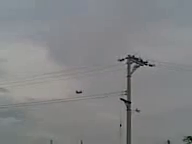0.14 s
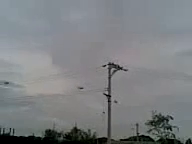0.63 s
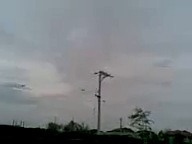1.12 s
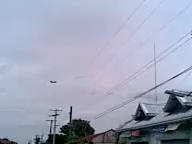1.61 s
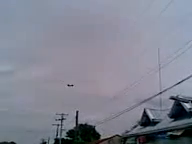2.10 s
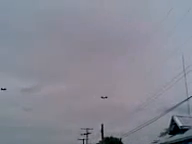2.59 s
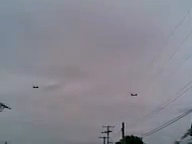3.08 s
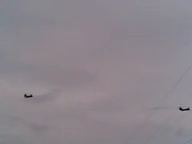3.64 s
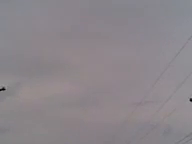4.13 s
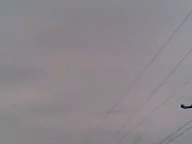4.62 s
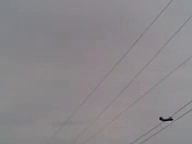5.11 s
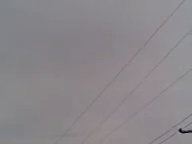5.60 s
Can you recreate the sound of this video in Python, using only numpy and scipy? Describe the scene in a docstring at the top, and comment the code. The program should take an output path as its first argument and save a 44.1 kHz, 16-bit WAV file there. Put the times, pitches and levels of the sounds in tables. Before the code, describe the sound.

Distant twin-rotor helicopters pass overhead, mostly buried by gusts striking the microphone at close range. Muffled, clipping thumps open the scene, followed by a quiet gap with dull rotor chops. After an abrupt cut, rumble, roar and hiss surge and tumble. Later the wind sinks, leaving muted rapid slaps and a thin drone in narrow, lo-fi sound.

```python
"""Twin-rotor helicopters pass far overhead, heard outdoors on a small hand-held microphone in gusty wind.
In runs, blade slaps crack some fourteen times a second, each a struck resonance with one echo off nearby walls.
Helicopters and rushing wind together make a broad drone, roar and hiss with a whine band, all flickering noise.
Close up, noise bursts thump on the microphone port and a lumpy noise rumbles and flutters there.
Two shots meet at a hard cut near 1.63 s; the narrow-band recorder overloads on the hardest gusts."""
import sys
import numpy as np
from scipy import signal
from scipy.io import wavfile

SR = 44100
rng = np.random.default_rng(int(sys.argv[2]) if len(sys.argv) > 2 else 0)


def to_linear_factor(level_db):
    """Convert decibel levels (scalar or array-like) to linear amplitude factors."""
    exponent = np.asarray(level_db, float) / 20
    return 10 ** exponent


def store_pcm(level_fs):
    """Save levels as 16-bit WAV."""
    pcm = np.round(np.clip(level_fs, -1, 1) * 32767).astype(np.int16)
    wavfile.write(sys.argv[1], SR, np.atleast_2d(pcm).T)


N = 252693

# Fixed resonances of every far slap. Each row: centre in Hz, width in Hz, level in dB.
SLAP_RESONANCES = [(416, 250, -8.5), (1400, 900, -13)]


def slaps():
    """A blade cuts the other rotor's vortex: a soft chop, a scattered tail and one smeared echo."""
    out = np.zeros(N)
    echo_lag = round(0.03 * SR)
    echo_db = -18
    for s, peak_db, hz in slap_rows():
        direct, back = rng.standard_normal((2, 8000))
        push = to_linear_factor(-16) * burst(direct, rise=0.0006, t60=0.075)
        push[40] += 1      # the crack itself, 0.9 ms in
        push[echo_lag:] += to_linear_factor(echo_db) * burst(back, rise=0.003, t60=0.07)[:-echo_lag]
        chop = resonance(resonance(push, hz, 0.25 * hz), hz, 0.25 * hz)
        for body_hz, width, level_db in SLAP_RESONANCES:
            chop += to_linear_factor(level_db) * resonance(push, body_hz, width)
        distant = dull(dull(chop, hz=1940), hz=2140)      # the long air path takes the treble
        add(out, s - 0.001, distant, peak_db)
    return out


# Runs of evenly spaced slaps. Each row: first slap in seconds, last slap in seconds.
SLAP_RUNS = [(0.781, 0.917), (1.189, 1.597), (3.719, 4.068), (4.801, 5.232), (5.252, 5.535), (5.588, 5.658)]
# The slaps as the machines move overhead, before scatter. Each row: time in seconds, peak in dB, centre in Hz.
SLAP_PATH = [(0.78, -41.5, 1130), (0.92, -30, 1170), (1.19, -29.5, 1100), (1.26, -32, 645),
             (1.33, -31.5, 665), (1.4, -28.5, 1100), (1.46, -30.5, 396), (1.53, -25, 684), (1.6, -25, 420),
             (3.72, -22.5, 370), (3.79, -25, 1100), (3.86, -31.5, 354), (4.07, -41.5, 377), (4.8, -32, 484),
             (5.08, -42, 425), (5.16, -36.5, 422), (5.24, -40, 600), (5.258, -26, 970), (5.32, -31, 590),
             (5.39, -21, 870), (5.46, -26.5, 1300), (5.54, -32.5, 464), (5.66, -28.5, 393)]


def slap_rows():
    """Time, peak dB and centre Hz of each blade pass; strength and pitch scatter from slap to slap."""
    blade_period_s = 0.0695
    scatter_db, pitch_scatter = 1.5, 0.06      # pitch as a fraction
    runs = []
    for first, last in SLAP_RUNS:
        count = round((last - first) / blade_period_s) + 1
        runs.append(np.linspace(first, last, count))
    s = np.concatenate(runs)
    at, path_db, path_hz = np.transpose(SLAP_PATH)
    chance = rng.standard_normal((len(s), 2))
    peak_db = np.interp(s, at, path_db) + scatter_db * chance[:, 0]
    hz = np.interp(s, at, path_hz) * np.exp(pitch_scatter * chance[:, 1])
    return zip(s, peak_db, hz)


# Broad drone, roar and hiss of helicopters and rushing wind together, with a whine band,
# in two lists: before and after the cut.
# Each row: time in seconds, drone in dB, roar in dB, hiss in dB, whine in dB.
WASH_LEVELS = [
    [(0.0, -35.5, -41, -39.5, -64), (0.24, -45, -48.5, -42.5, -59), (0.43, -31.5, -32.5, -45, -57),
     (0.65, -47, -50, -45, -66), (0.84, -63, -63, -54.5, -60.5), (1.1, -71, -59.5, -64.5, -69.5),
     (1.35, -74, -53.5, -83, -62), (1.43, -49.5, -47, -51.5, -62.5), (1.622, -53, -41.5, -77, -65)],
    [(1.63, -52, -24.5, -40, -60), (1.84, -44, -33, -40.5, -53), (2.07, -39.5, -33.5, -51, -54),
     (2.35, -53.5, -41, -44, -57), (2.62, -48, -38.5, -50, -57.5), (2.94, -43.5, -36, -53.5, -64.5),
     (3.1, -41, -41, -58, -57.5), (3.31, -48, -24.5, -49, -57), (3.4, -26.5, -59.5, -53.5, -79),
     (3.5, -38.5, -31, -45.5, -59.5), (3.67, -41.5, -38.5, -64, -68), (3.8, -41.5, -40, -52, -64),
     (3.94, -41, -57, -54, -63), (4.0, -51, -55, -65, -72.5), (4.3, -57, -54, -64, -76),
     (4.53, -45, -46.5, -56.5, -68.5), (5.05, -54.5, -58, -66.5, -82.5), (5.3, -48, -51, -64, -77),
     (5.4, -44.5, -43.5, -69, -79), (5.55, -40, -44.5, -57, -70), (5.73, -43.5, -48.5, -62, -71)],
]
# Spectra of the broad drone, roar and hiss. Each row: frequency in Hz, relative density in dB per Hz.
DRONE_SPECTRUM = [(53, -36), (90, 1), (135, 7), (297, -1), (415, 8), (700, -5.5), (910, -45.5),
                  (1540, -120)]
ROAR_SPECTRUM = [(380, -28), (650, -3), (1050, 15.5), (1310, 5.5), (2050, -7), (2360, -12.5), (2600, -20),
                 (3380, -42), (5720, -120)]
HISS_SPECTRUM = [(1060, -20), (1800, 4.5), (2080, 5), (2350, 7.5), (2960, 0), (3410, -5), (4050, -15),
                 (5260, -39.5), (8910, -120)]


def helicopter_and_wind_wash():
    """Shimmering drone and roar of helicopters and wind, a treble hiss that is stronger in windy parts, a
    whine."""
    drone_db, roar_db, hiss_db, whine_db = in_time(WASH_LEVELS)
    drone = banded_noise(DRONE_SPECTRUM, shared_db=4.0, own_db=-0.5, rate=23)
    roar = banded_noise(ROAR_SPECTRUM, shared_db=2.5, own_db=3.0, rate=30)
    hiss = banded_noise(HISS_SPECTRUM, shared_db=4.0, own_db=3.0, rate=51)
    return to_linear_factor(drone_db) * drone + to_linear_factor(roar_db) * roar + to_linear_factor(hiss_db) * hiss + whine(whine_db)


def whine(level_db):
    """A breathy whine band: noise twice through one resonance, its level flickering."""
    hz, width_hz = 3353, 610
    once = resonance(rng.standard_normal(N), hz, width_hz)
    twice = resonance(once, hz, width_hz)
    return to_linear_factor(level_db + 3.4 * drift(25)) * rms_one(twice)


# Strong buffets right at the microphone port.
# Each row: start in seconds, peak in dB, centre in Hz, rasp in dB under the wobble,
# t60 decay in seconds (burst() holds it to 0.2 at most).
BUFFETS = [(0.015, -11.5, 272, -18, 0.1), (0.076, -0.5, 543, -31, 0.041), (0.119, -17, 263, -38.5, 0.17),
           (0.258, -3, 493.5, -20.5, 0.05), (0.285, -0.5, 671, -39, 0.028), (0.315, -7, 656, -18.5, 0.05),
           (0.349, -20.5, 425, -22, 0.11), (0.378, -10.5, 438, -28, 0.06), (0.406, -14.5, 670, -29, 0.13),
           (0.497, -9, 663, -25, 0.017), (0.512, -0.5, 572, -21, 0.047), (0.534, -4.5, 604, -26, 0.04),
           (0.558, -8, 557, -37, 0.038), (0.591, -4.5, 650, -28, 0.049), (0.624, -8.5, 436, -38, 0.12),
           (0.683, -20, 490, -11.5, 0.06), (0.816, -28.5, 510, -25, 0.14), (0.998, -16.5, 406, -35, 0.077),
           (1.009, -24, 460, -34, 0.028), (1.105, -16, 159, -27, 0.13), (1.118, -24, 700, -26, 0.042),
           (1.627, -4, 300, -19, 0.024), (1.628, -5, 1300, -16, 0.017), (1.697, -16.5, 1400, -26, 0.077),
           (1.765, -12, 311, -16.5, 0.042), (1.83, -11, 340, -19.5, 0.12), (1.893, -9.5, 177, -30, 0.034),
           (1.946, -5, 425, -22, 0.023), (1.967, 1, 235, -34, 0.02), (2.018, -16.5, 167, -26.5, 0.028),
           (2.044, -9.5, 310.5, -30.5, 0.03), (2.11, -10.5, 166, -25.5, 0.11),
           (2.168, -4.5, 420, -28.5, 0.3), (2.189, -4, 196, -30.5, 0.043), (2.231, -4.5, 187, -24, 0.086),
           (2.323, -7, 171, -20, 0.052), (2.343, 0, 412.6, -33.5, 0.018), (2.36, -3.5, 502, -23, 0.019),
           (2.378, -6, 389, -25, 0.027), (2.41, -1.5, 244, -29, 0.055), (2.499, -5.5, 318, -20, 0.02),
           (2.509, -2.5, 606, -27, 0.045), (2.561, -13, 259, -32, 0.086), (2.67, -5, 580, -25, 0.13),
           (2.718, -5, 308.6, -17.5, 0.02), (2.743, -0.5, 245, -25.5, 0.098), (2.768, -2, 627, -21, 0.036),
           (2.808, -7.5, 296, -24, 0.086), (2.868, -26, 405, -26.5, 0.02), (2.908, -10, 424, -25.5, 0.18),
           (2.991, -6.5, 192, -25, 0.041), (3.045, -6, 355, -29, 0.075), (3.068, -8, 245, -34, 0.15),
           (3.138, -2, 579, -30, 0.05), (3.159, -1, 388, -30, 0.033), (3.179, -4, 630, -23.5, 0.052),
           (3.204, -3, 392, -22.5, 0.063), (3.239, -3.5, 253.3, -18.5, 0.021),
           (3.275, -2, 294.5, -19, 0.055), (3.307, -0.5, 665, -20.5, 0.032), (3.352, -3.5, 526, -28, 0.028),
           (3.414, -9.5, 395, -40, 0.02), (3.45, -7, 226, -30, 0.26), (3.488, -11.5, 694, -20, 0.21),
           (3.603, -7, 500, -28, 0.053), (3.647, -12.5, 157, -25, 0.071), (4.185, -20, 620, -37, 0.089),
           (4.34, -8.5, 521, -35, 0.049), (4.379, -19, 223, -25, 0.19), (4.427, -8, 429, -34, 0.13),
           (4.464, -12, 250, -46, 0.03), (4.49, -17.5, 402, -33, 0.037), (4.524, -10.5, 483, -36, 0.11),
           (4.559, -9.5, 493, -31, 0.018), (4.605, -14.5, 166, -32, 0.14), (4.648, -17, 171, -42, 0.13)]


def buffets():
    """An eddy hits the port: a wobble around its own pitch, a broad puff under it, a rasp of air on top."""
    out = np.zeros(N)
    noise = rng.standard_normal((len(BUFFETS), 3, 8000))
    for (s, peak_db, hz, rasp_db, t60), (narrow, broad, thin) in zip(BUFFETS, noise):
        wobble = rms_one(resonance(resonance(narrow, hz, 0.5 * hz), hz, 0.48 * hz))
        puff = rms_one(resonance(resonance(broad, 350, 420), 400, 490))
        rasp = rms_one(resonance(thin, 670, 1000))
        body = dull(burst(wobble + to_linear_factor(-4.0) * puff, rise=0.003, t60=t60), hz=1300)
        air = to_linear_factor(rasp_db) * burst(rasp, rise=0.0041, t60=t60)
        add(out, max(s - 0.003, 0), body + air, peak_db)
    return out


# Wind at the port, ahead of its limit, in two lists: before and after the cut.
# Each row: time in seconds, rumble in dB, flutter in dB.
WIND_LEVELS = [
    [(0.0, -18, -18.5), (0.13, -24.5, -25), (0.23, -57.5, -48), (0.26, -21.5, -13), (0.42, -31.5, -19),
     (0.47, -28.5, -29), (0.6, -31.5, -21.5), (0.72, -37.5, -36), (0.79, -56, -56), (0.97, -48.5, -49),
     (1.11, -38, -40), (1.28, -49, -46.5), (1.622, -50.5, -48)],
    [(1.63, -22.5, -36.5), (1.9, -18, -31.5), (2.03, -12.5, -24.5), (2.15, -24.5, -31), (2.2, -17, -26),
     (2.31, -19.5, -29.5), (2.37, -20.5, -13.5), (2.52, -10, -11.5), (2.62, -25.5, -35.5),
     (2.7, -13.5, -19), (2.85, -18.5, -17), (2.93, -26, -13), (3.02, -17, -28.5), (3.14, -20, -17.5),
     (3.27, -16.5, -13), (3.38, -19.5, -21.5), (3.5, -22.5, -7), (3.6, -24, -31), (3.71, -40, -38),
     (3.92, -41.5, -58), (4.14, -39, -40.5), (4.32, -40.5, -48), (4.36, -28, -32), (4.46, -21.5, -31),
     (4.65, -33, -27), (4.74, -33.5, -64), (4.94, -50, -56), (5.2, -63, -63), (5.5, -56, -54),
     (5.73, -46, -51)],
]
# Spectra of the wind at the port. Each row: frequency in Hz, relative density in dB per Hz.
RUMBLE_SPECTRUM = [(18, -57), (30, -27.5), (80, -0.5), (134, 4.5), (400, -4.5), (520, -38), (880, -120)]
FLUTTER_SPECTRUM = [(120, -19.5), (200, -5.5), (653, -6), (976, -14), (1060, -16), (1130, -25), (1520, -39),
                    (2200, -54), (2860, -66.5), (4840, -120)]


def wind():
    """Turbulence at the port: a lumpy rumble and a choppier flutter that comes in small eddies."""
    port_limit = 0.45
    rumble_db, flutter_db = in_time(WIND_LEVELS)
    rumble = banded_noise(RUMBLE_SPECTRUM, shared_db=3.0, own_db=-1.5, rate=36)
    flutter = banded_noise(FLUTTER_SPECTRUM, shared_db=7.0, own_db=1.5, rate=60.6)
    swing = to_linear_factor(rumble_db) * rumble + to_linear_factor(flutter_db) * flutter
    choked = port_limit * np.tanh(swing / port_limit)      # the narrow port chokes the biggest swings
    return dull(choked, hz=1100)


# The level dips briefly.
# Each row: middle in seconds, depth in dB, length in seconds (full width where 1/e of the depth is left).
LULLS = [(0.309, 12, 0.024), (0.618, 16, 0.0087), (2.652, 6.5, 0.032), (2.798, 8, 0.012), (2.858, 14, .016),
         (3.006, 8, 0.0067), (3.118, 2, 0.038), (3.359, 5.5, 0.049), (3.4, 1, 0.013), (3.563, 11, 0.037),
         (4.128, 7, 0.016)]


def lulls():
    """Gain that sinks and recovers in a bell shape at each dip."""
    t = np.arange(N) / SR
    dip_db = sum(depth_db * np.exp(-(2 * (t - s) / length) ** 2) for s, depth_db, length in LULLS)
    return to_linear_factor(-dip_db)


def rms_one(x):
    """Scale to unit rms."""
    return x / np.sqrt(np.mean(x ** 2) + 1e-20)


def in_time(shots):
    """Columns of the joined level tables, one value a sample."""
    s, *columns = np.transpose(np.concatenate(shots))
    return [np.interp(np.arange(N) / SR, s, column) for column in columns]


def drift(rate):
    """Slow chance of spread 1: noise at every 20th sample through a double one-pole low-pass at rate Hz."""
    r = np.exp(-40 * np.pi * rate / SR)
    slow = signal.lfilter([1], [1, -2 * r, r * r], rng.standard_normal(N // 20 + 2002))
    slow = slow[2000:]      # skip the filter's start
    return np.interp(np.arange(N) / 20, np.arange(len(slow)), rms_one(slow))


def resonance(x, hz, width):
    """Two-pole band-pass with gain 1 on top."""
    r = np.exp(-np.pi * width / SR)
    zeros = [(1 - r * r) / 2, 0, (r * r - 1) / 2]
    poles = [1, -2 * r * np.cos(2 * np.pi * hz / SR), r * r]
    return signal.lfilter(zeros, poles, x)


def dull(x, hz):
    """Low-pass that takes the edge off."""
    return signal.sosfilt(signal.butter(2, hz, fs=SR, output="sos"), x)


def banded_noise(spectrum, shared_db, own_db, rate):
    """Third-octave bands of noise that flicker partly together, partly alone; rms 1."""
    table_hz, table_db = np.transpose(spectrum)
    edges = 25 * 2 ** np.arange(0, 7.7, 1 / 3)
    together = drift(rate)
    white = rng.standard_normal((2, N))      # neighbouring bands use different noise
    out = 0
    for k, (low, high) in enumerate(zip(edges, edges[1:])):
        level_db = np.interp(np.log(low * high) / 2, np.log(table_hz), table_db)
        band_pass = signal.butter(2, [low, high], "band", fs=SR, output="sos")
        band = signal.sosfilt(band_pass, white[k % 2])
        out = out + band * to_linear_factor(level_db + own_db * drift(rate / 2))
    flicker_db = 2 * shared_db * np.tanh(together / 2)
    return rms_one(out * to_linear_factor(flicker_db))


def burst(noise, rise, t60):
    """Noise that swells within the rise time and then dies away, both in seconds."""
    t = np.arange(len(noise)) / SR
    swell = (1 - np.exp(-t / rise)) ** 2
    decay = np.exp(-np.log(1000) * t / np.clip(t60, 0.01, 0.2))
    return noise * swell * decay


def add(out, s, sound, peak_db):
    """Mix a sound in at a time, with a given peak."""
    i = round(s * SR)
    scaled = to_linear_factor(peak_db) * sound / np.abs(sound).max()
    out[i:i + len(sound)] += scaled[:N - i]


def scene():
    """Far helicopters over the wind at the microphone; the dips spare the slaps."""
    dipping = helicopter_and_wind_wash() + buffets() + wind()
    return (slaps() + dipping * lulls())[None]


def top_cut(x):
    """Nothing passes above the cut-off."""
    return signal.sosfilt(signal.butter(12, 15800, fs=SR, output="sos"), x)


def record(dry):
    """The capsule loses deep bass and rounds big swings; a narrow band is kept; hard peaks are cut flat."""
    saturation, overload = 1.2, 0.71      # full scale is 1
    capsule = signal.sosfilt(signal.butter(2, 85, "high", fs=SR, output="sos"), dry)
    capsule = saturation * np.tanh(capsule / saturation)
    narrow = signal.sosfilt(signal.cheby2(12, 70, 4900, fs=SR, output="sos"), capsule)
    clipped = np.clip(narrow, -overload, overload)      # throws ticks into the empty treble
    return top_cut(clipped)


dry = scene()
out = record(dry)
store_pcm(out)
```